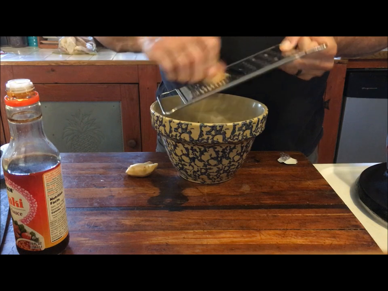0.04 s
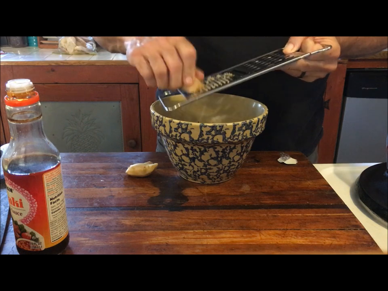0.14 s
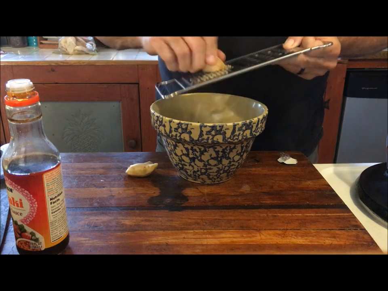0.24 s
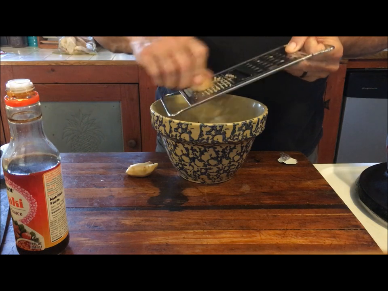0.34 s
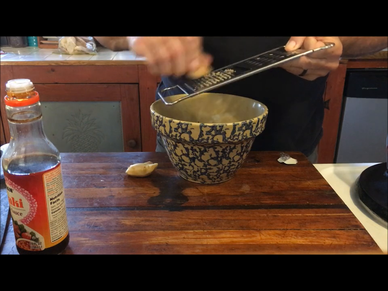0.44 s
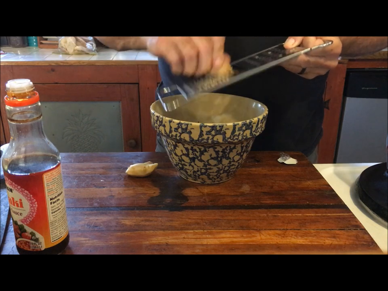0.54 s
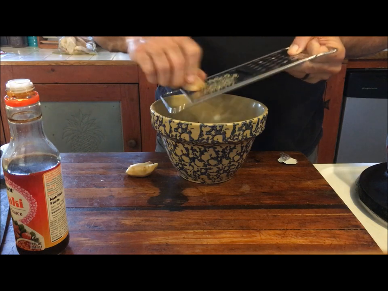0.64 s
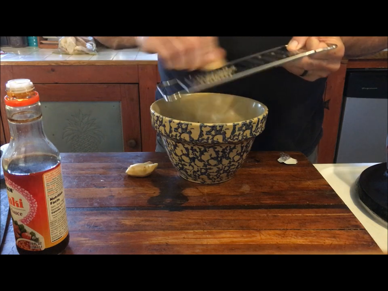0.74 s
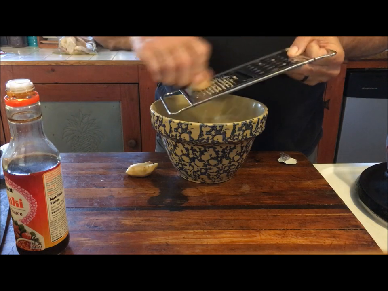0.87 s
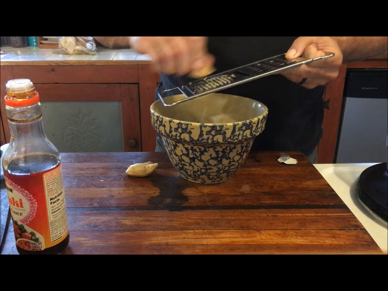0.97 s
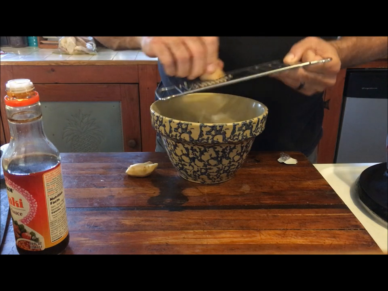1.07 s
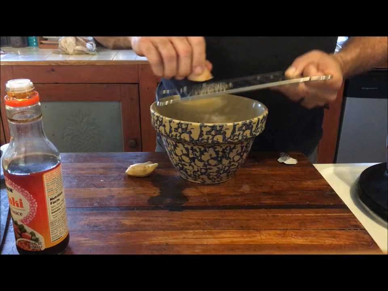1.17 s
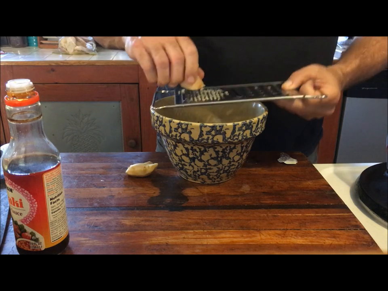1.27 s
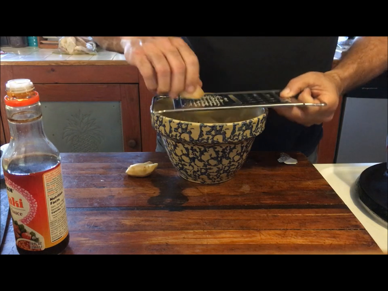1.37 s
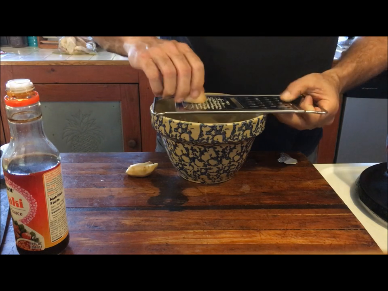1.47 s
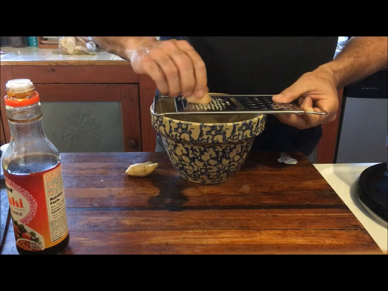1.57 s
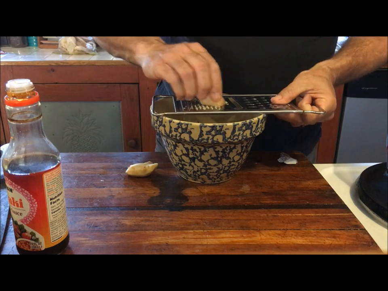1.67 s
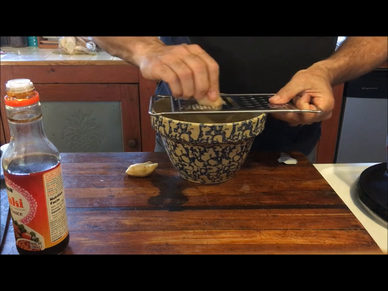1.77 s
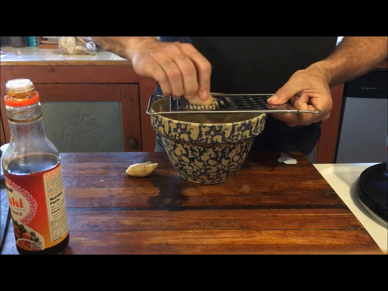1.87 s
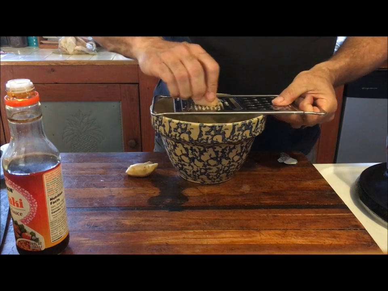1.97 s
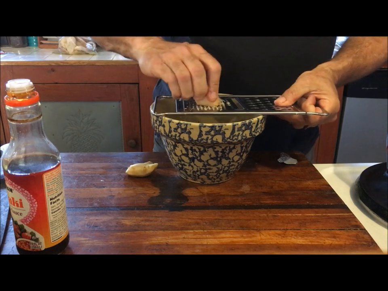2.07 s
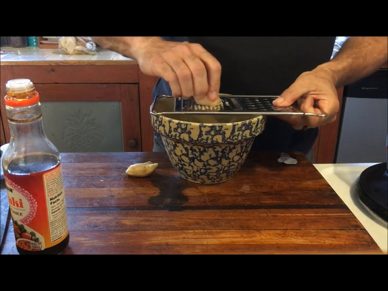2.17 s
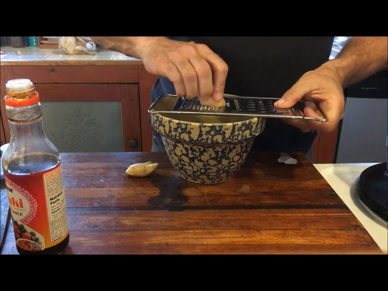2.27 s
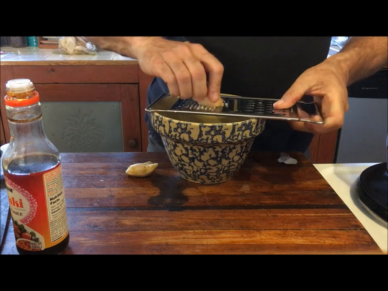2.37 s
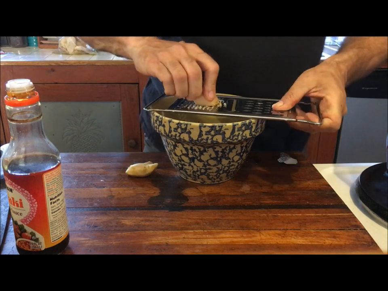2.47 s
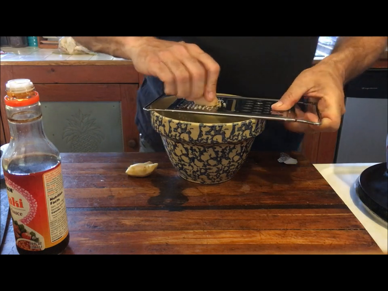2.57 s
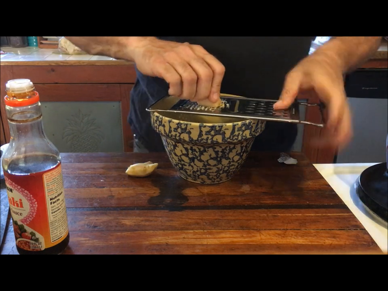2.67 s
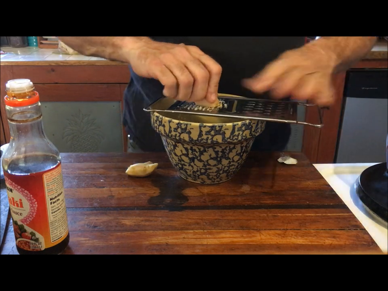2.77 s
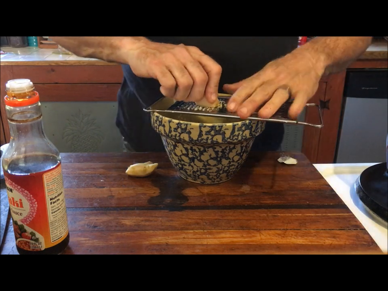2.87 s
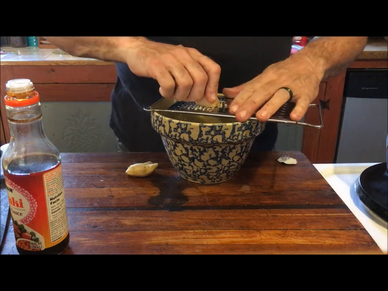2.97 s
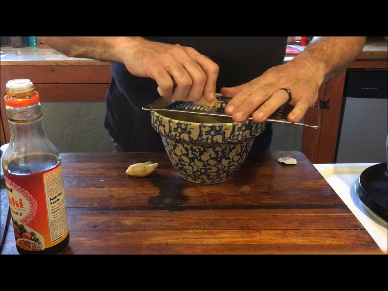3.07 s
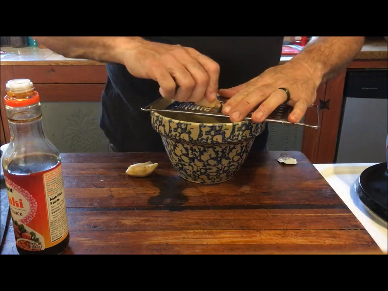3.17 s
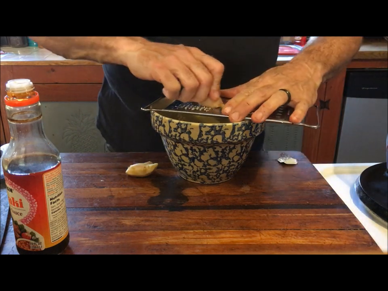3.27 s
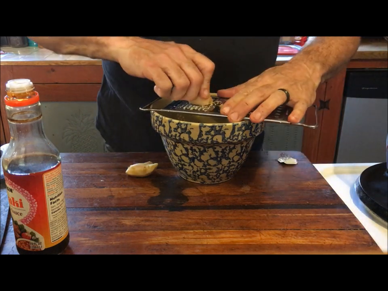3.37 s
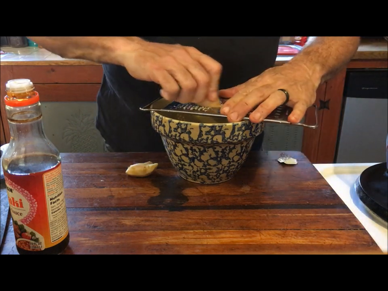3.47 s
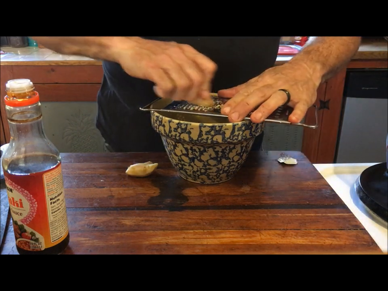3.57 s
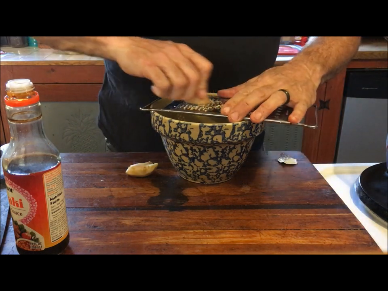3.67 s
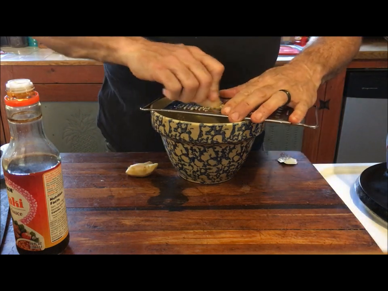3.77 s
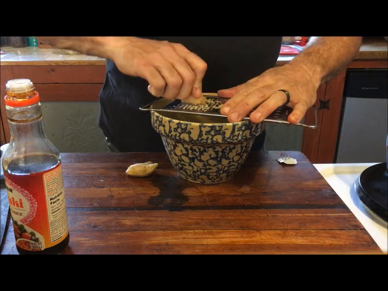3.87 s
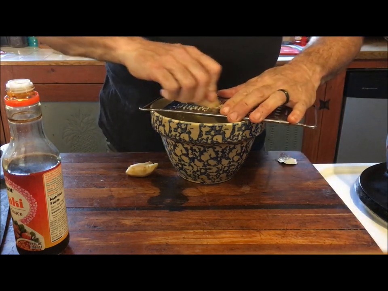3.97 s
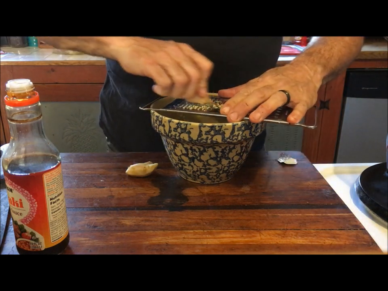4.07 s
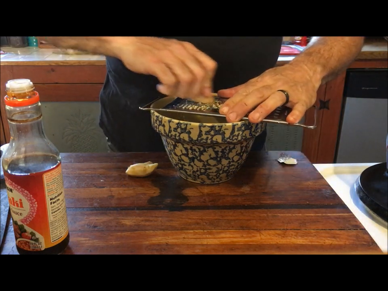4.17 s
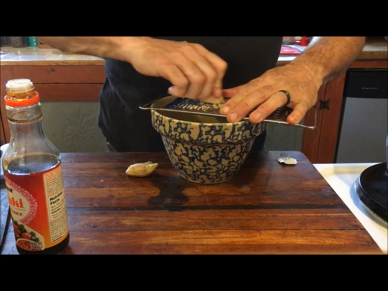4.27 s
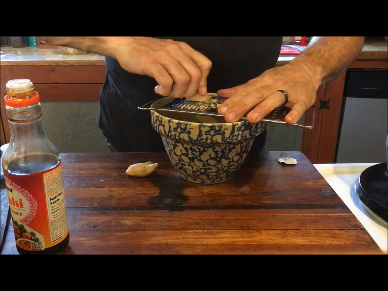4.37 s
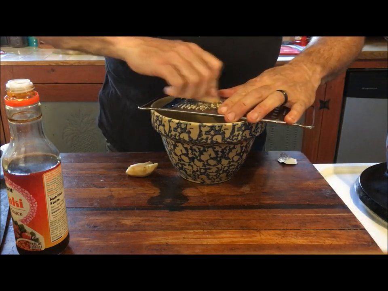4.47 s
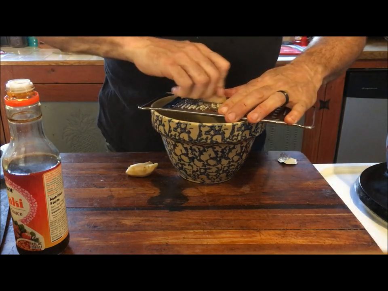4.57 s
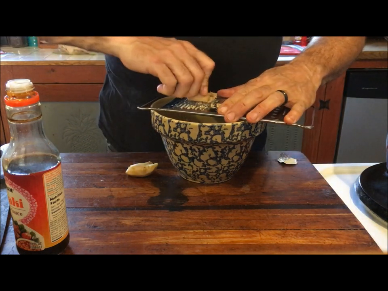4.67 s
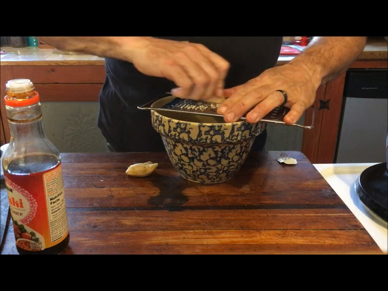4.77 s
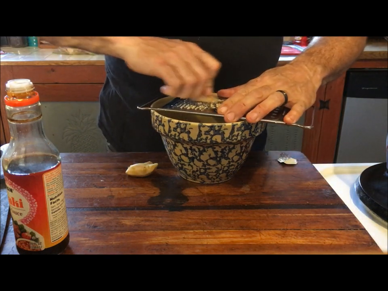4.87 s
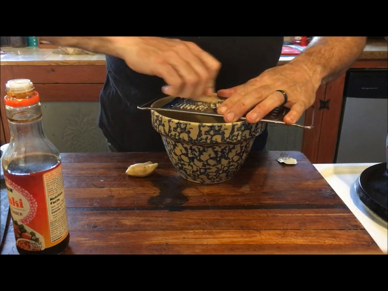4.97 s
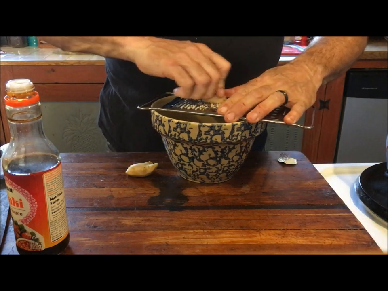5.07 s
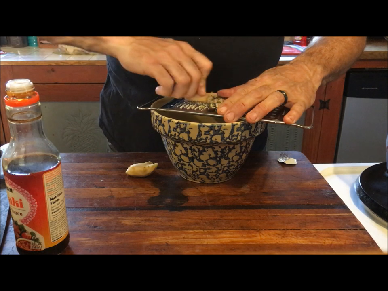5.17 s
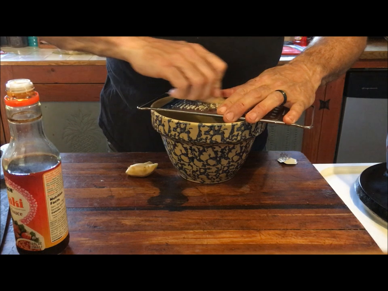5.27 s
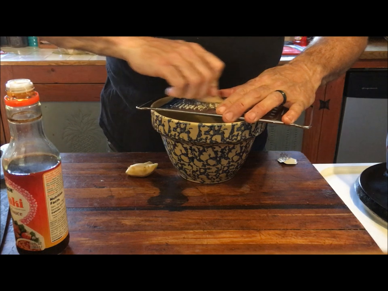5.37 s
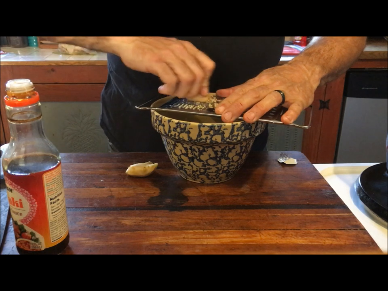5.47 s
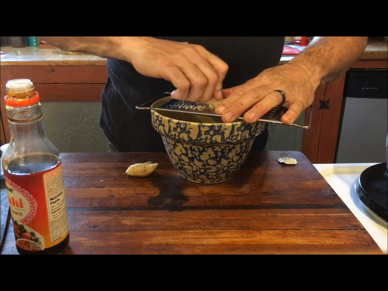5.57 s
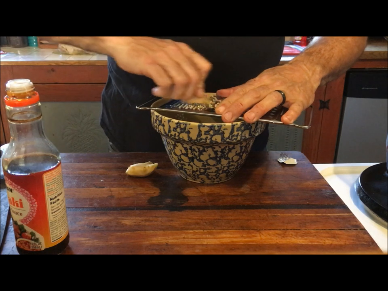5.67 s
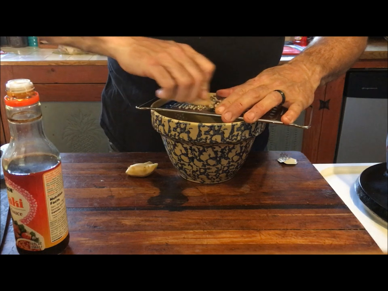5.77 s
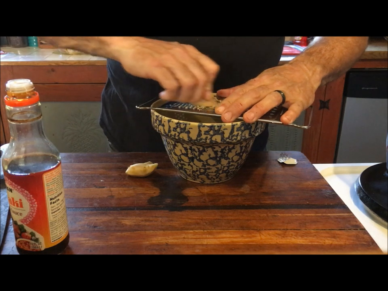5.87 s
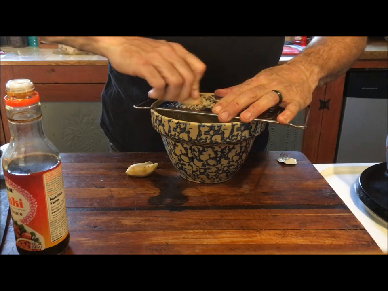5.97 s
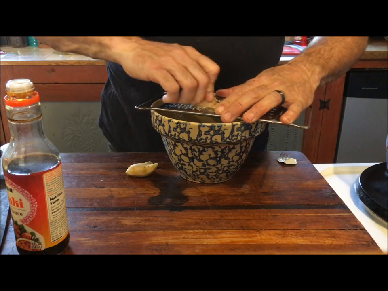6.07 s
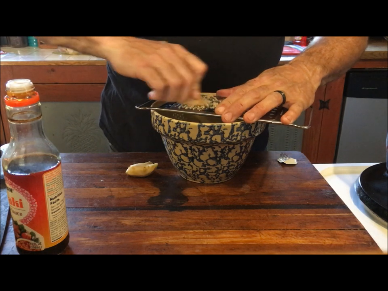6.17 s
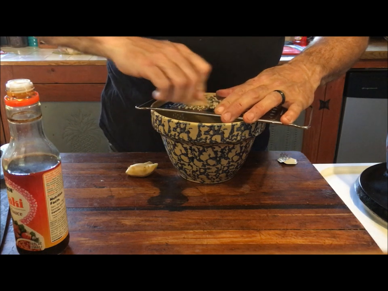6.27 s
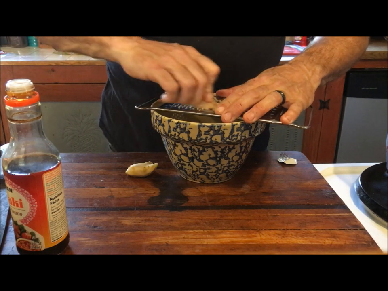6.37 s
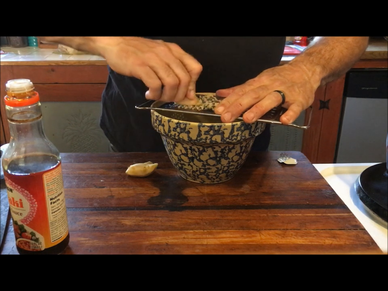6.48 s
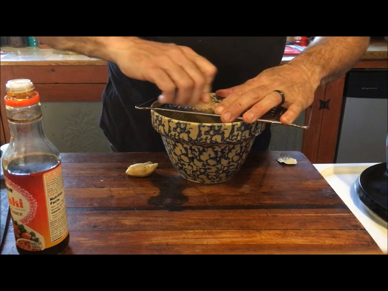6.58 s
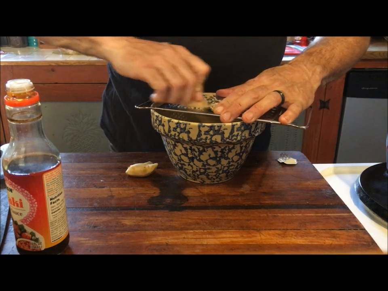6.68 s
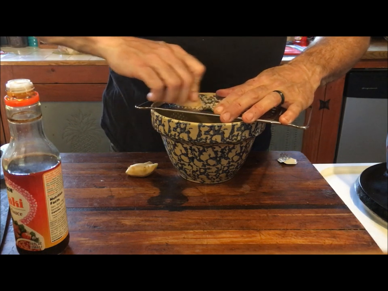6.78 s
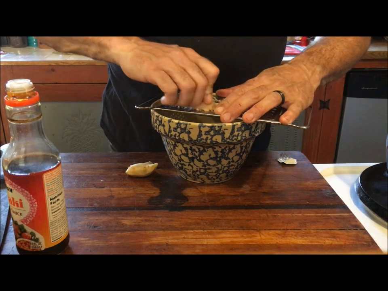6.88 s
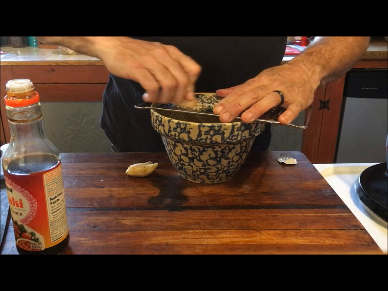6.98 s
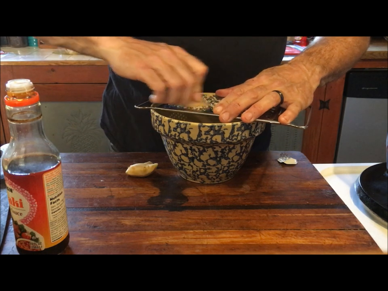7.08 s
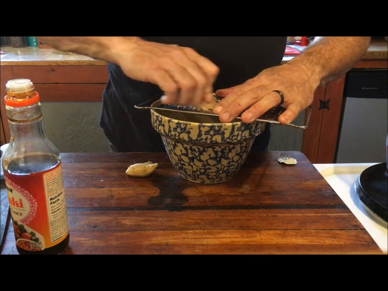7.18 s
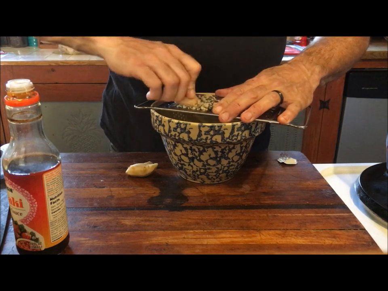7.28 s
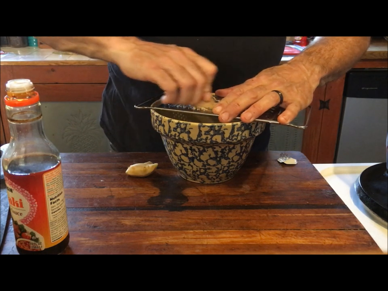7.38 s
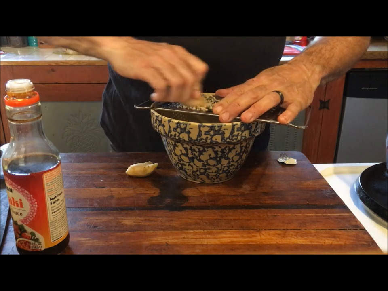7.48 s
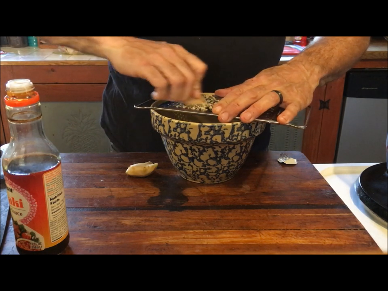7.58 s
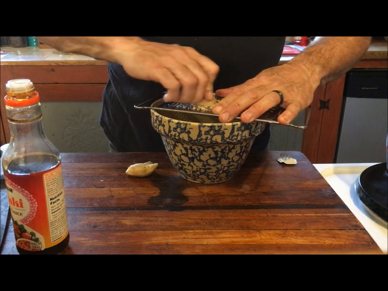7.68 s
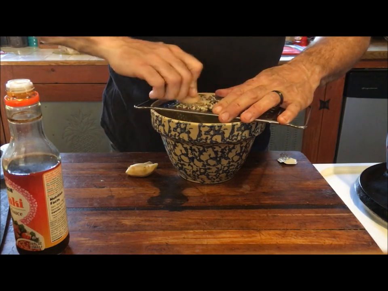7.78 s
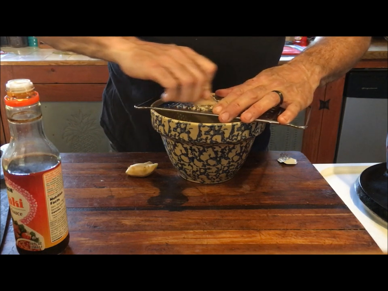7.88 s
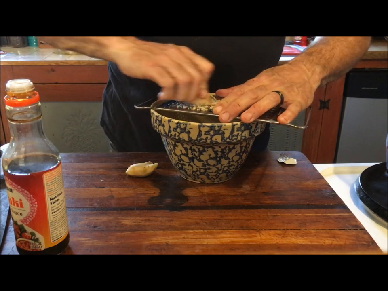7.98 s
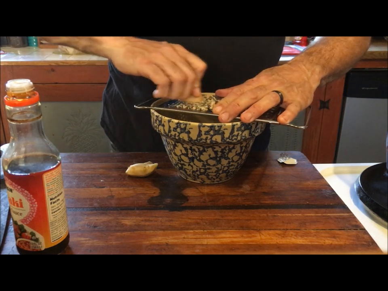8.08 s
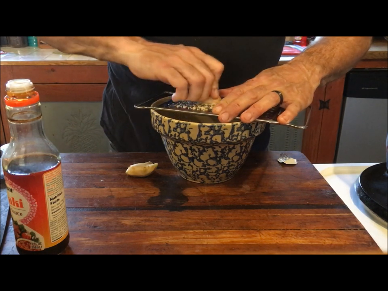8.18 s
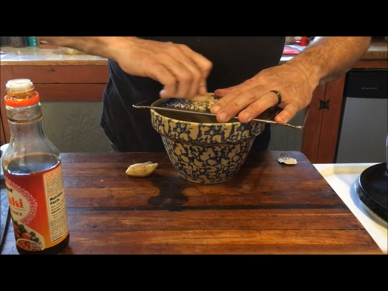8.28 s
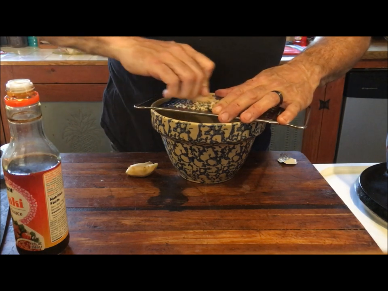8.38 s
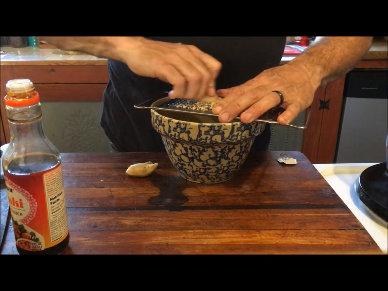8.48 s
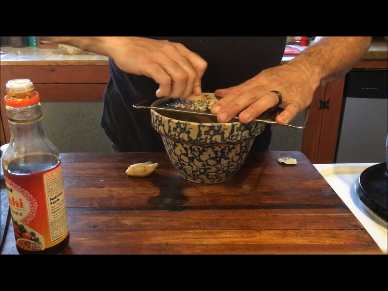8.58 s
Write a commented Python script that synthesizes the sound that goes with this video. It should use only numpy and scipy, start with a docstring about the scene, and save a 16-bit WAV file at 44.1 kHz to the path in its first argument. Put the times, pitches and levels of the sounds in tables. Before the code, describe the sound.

Raspy grating strokes and a few steel clinks, then quick back-and-forth grating with dull knocks of a bowl rocking on wood.

```python
"""In a softly humming kitchen, ginger is grated on a flat steel rasp.
The rasp is first held in the air, then laid clinking across a stoneware bowl.
Each stroke snaps a dense spray of fibres on the teeth; the blade rings when it touches or slides on
the rim. Under the quick back-and-forth strokes the bowl rocks and knocks on the wooden counter."""
import sys
import numpy as np
from scipy import signal
from scipy.fft import rfft, irfft, next_fast_len
from scipy.io import wavfile
from scipy.ndimage import uniform_filter1d

SR = 44100
rng = np.random.default_rng(int(sys.argv[2]) if len(sys.argv) > 2 else 0)


def dump(signal):
    """Clip the signal to [-1, 1] and save it as 16-bit WAV at the path in sys.argv[1]."""
    limited = np.clip(np.atleast_2d(signal).T, -1, 1)
    pcm = np.round(limited * 32767).astype(np.int16)
    wavfile.write(sys.argv[1], SR, pcm)


N = 380564
T = np.arange(N) / SR
RING_T = T[:SR // 2]  # half a second for a sound to die away

# A colour lists how strong each frequency is. A mode is one tone that a struck object rings with.
# t60 is the time a sound takes to fade by 60 dB, before any extra damping.
# colour of the kitchen's hum: f/Hz, level/dB
HUM_COLOUR = [(20, -29.5), (30, -20.5), (42, -35.5), (55, -4), (75, -6.5), (133, -19), (255, -24.5),
              (450, -34), (690, -41), (1280, -44), (5000, -52), (15800, -50)]
# echo from the walls: f/Hz, level/dB, t60/s
WALL_BANDS = [(61, 7.5, 0.58), (507, 2, 0.34), (2000, -2, 0.42), (5050, -4, 0.34), (10160, -5, 0.22),
              (16000, -6.5, 0.15)]
# rumble of the hand on the blade: t/s, level/dB
GRIP_LEVELS = [(1.36, -87), (1.42, -55.5), (1.65, -52.5), (2.0, -57), (2.6, -61.5), (3.501, -61.5),
               (3.8, -61)]
# colour of that rumble: f/Hz, level/dB
GRIP_COLOUR = [(30, -27), (75, -6), (160, -1), (300, -19), (700, -13.5), (2000, -24.5)]
# colour of the root's dull touch: f/Hz, level/dB
PAT_COLOUR = [(200, -32.5), (450, 6.5), (750, 1.5), (1200, -23.5), (2200, -17.5), (4000, -69)]
# colour of the counter's rumble under the strokes: f/Hz, level/dB
DRAG_COLOUR = [(30, -25), (70, 0), (170, 3), (300, -7.5), (420, -9), (550, -52), (1300, -15.5),
               (3000, -40)]

# the bowl rocks back onto the counter: t/s, strength/dB
KNOCKS = [(3.781, -36), (3.891, -23.5), (4.404, -26), (4.659, -19.5), (4.852, -37), (4.924, -19.5),
          (5.189, -19), (5.371, -29), (5.45, -14.5), (5.701, -28.5), (5.964, -23), (6.227, -17),
          (6.474, -19.5), (6.676, -29.5), (6.737, -15), (6.993, -13.5), (7.185, -31.5), (7.267, -30.5),
          (7.451, -24.5), (7.526, -27.5), (7.783, -31), (8.049, -21), (8.586, -14)]
# ring of the wooden counter: f/Hz, level/dB, t60/s
COUNTER_MODES = [(99, -10, .4), (145, -3, .42), (182, -11, .3), (203, -11, .25), (286, -10, .32),
                 (382, -10, .3), (467, -12, .2), (562, -9, .14), (625, -5, .18), (682, -6, .16),
                 (765, -8, .16), (803, -8, .18), (905, -17, .18), (1075, -14, .15), (1254, -8, .14),
                 (1295, -8, .15), (1365, -10, .13), (1605, -13, .12)]
# short swings of the bowl on its foot: f/Hz, level/dB, t60/s
CLOP_MODES = [(142, -3, .13), (190, -7, .11), (375, -7, .045), (635, 1.5, .055), (790, -4, .06),
              (1310, -5, .04), (1650, -8, .03)]
# noisy thud of the counter: f/Hz, level/dB, t60/s
THUD_BANDS = [(35, -30, 0.37), (67, -1.5, 0.45), (161, 1.5, 0.29), (208, -1.5, 0.24), (340, -8.5, 0.21),
              (463, -8.5, 0.35), (600, -12, 0.3), (960, -10, 0.2), (1190, -6.5, 0.11), (1720, -13, 0.052),
              (2390, -17, .12), (5000, -46, 0.12)]
# softer landings lose highs faster than lows: f/Hz, loss/(dB per dB of strength)
SOFTENING = [(150, 0.58), (350, 0.38), (620, 1.6), (1400, 1.68)]

# ring of the steel blade: f/Hz, level/dB, t60/s
BLADE_MODES = [(875, -17, .09), (3280, -19, .06), (4245, 0.5, .062), (4468, -17, .08), (5690, -11, .035),
               (5915, -10, .04), (6535, -13, .055), (6800, -15, .04), (7180, -12, .04), (7480, -5, .035),
               (8070, -13, .035), (8460, -12, .04), (11320, -2, .025), (12115, -2, .025), (12340, -1, .025),
               (12710, -9, .02), (13420, -7, .02)]
# ring of the stoneware bowl: f/Hz, level/dB, t60/s
BOWL_MODES = [(705, -8, .05), (1260, -10, .04), (1385, -6, .04), (1485, -4, .045), (1830, -10, .04),
              (2338, 0, .055), (2660, -7, .045), (3203, -13, .045), (3630, -13, .04)]
# the blade slides along the rim: t/s, length/s, level/dB
SLIDES = [(1.39, 0.088, -52), (1.48, 0.21, -42), (1.88, 0.25, -52.5), (2.23, 0.28, -50.5),
          (2.46, 0.14, -59.5), (2.665, 0.076, -45), (2.76, 0.091, -54.5), (2.955, 0.036, -57.5),
          (3.098, 0.059, -52.5), (3.183, 0.053, -51.5)]
# colour of steel scraping the rim: f/Hz, level/dB
RIM_COLOUR = [(100, -9.5), (300, 6.5), (600, 0), (1300, 3), (2400, -0.5), (3500, -4.5), (5000, -4),
              (5850, 0.5), (7000, -10), (12500, -10), (16000, -23.5)]
# taps on the blade, by the hand and later on the rim: t/s, level/dB, blade share/dB, bowl share/dB
CLINKS = [(0.1055, -12.5, -19, -57), (.649, -8.5, -8.5, -29.5), (1.2815, -15.5, -11, -18.5),
          (1.3768, -5.5, -9, -22.5), (1.423, -20.5, -25, -17), (1.492, -25, -6.5, -12),
          (1.5197, -8, -20.5, -25.5), (1.537, -17, -21, -30), (1.581, -36, 1, -31),
          (1.784, -33.5, -28, -15), (1.878, -30.5, -14, -36), (1.898, -23, -21, -24),
          (1.905, -20, -11.5, -8.5), (2.007, -33.5, -11, -24), (2.4538, -32, -11.5, -15),
          (3.4163, -30.5, -13.5, -4)]
# colour of the crack that starts a tap: f/Hz, level/dB
CRACK_COLOUR = [(150, 3.5), (700, -4), (2500, -2.5), (3400, -1.5), (4900, -4.5), (5800, 4), (8200, -3.5),
                (10200, 1), (12200, -9.5), (14000, -5), (16000, 3)]

# the root is set down for single strokes: t/s, length/s, level/dB
SINGLE_STROKES = [(0.0409, 0.18, -43), (0.3133, .15, -46.5), (0.575, 0.19, -45), (0.8339, 0.18, -46.5),
                  (1.85, 0.26, -59), (2.22, 0.26, -54.5), (2.44, 0.15, -56), (3.21, 0.1, -60.5)]
# steady grating, just under four cycles a second: t/s, count/cycles
PACE = [(3.366, 0), (4.366, 4), (5.699, 9), (6.72, 13), (7.259, 15), (8.297, 19), (8.84, 21)]
# how hard the root is pushed over the teeth: t/s, level/dB
PRESSURE = [(3.37, -50), (3.62, -44.5), (3.87, -48.5), (4.15, -43.5), (5.2, -41.5), (6.4, -41.5),
            (7.0, -43), (8.5, -42)]
# ring of the toothed face with the root pressed on it: f/Hz, level/dB, t60/s
TEETH_MODES = [(2630, -8, .022), (3130, -6, .014), (4280, -9, .03), (5930, -1, .009), (8150, -1, .008),
               (9450, 1, .005), (13000, 8, .002)]
# colour of tearing fibres: f/Hz, level/dB
FIBRE_COLOUR = [(150, -23), (500, -1.5), (1000, -8.5), (2000, -10.5), (3300, -9.5), (4900, -10.5),
                (5900, -5.5), (7000, -9.5), (8800, -2), (10300, -9), (12300, 0), (13500, -0.5), (16000, -3)]


def undb(db):
    """Turn decibels into a factor to multiply by."""
    return 10 ** (np.asarray(db) / 20)


def unit(x):
    """Scale x to an average strength (rms) of 1."""
    return x / np.sqrt(np.mean(x ** 2))


def shape(x, gain):
    """Filter x: multiply each frequency by gain(hz)."""
    size = next_fast_len(len(x) + 4096)
    hz = np.maximum(np.arange(size // 2 + 1) * SR / size, 1)
    return irfft(rfft(x, size) * gain(hz), size)[:len(x)]


def colour(x, points):
    """Filter x with a colour table, then scale it to strength 1."""
    f, db = np.transpose(points)
    return unit(shape(x, lambda hz: undb(np.interp(np.log(hz), np.log(f), db))))


def noise(points, size=len(RING_T)):
    """Noise of the given colour, at strength 1."""
    return colour(rng.standard_normal(size), points)


def fade(t60):
    """A curve that falls by 60 dB in t60 seconds."""
    return np.exp(-np.log(1000) * RING_T / t60)


def tail(bands):
    """Noise in which each frequency band dies away at its own pace."""
    f, db, t60 = np.transpose(bands)
    spectrum = rfft(noise(np.transpose([f, db])))
    log_hz = np.log(np.linspace(1, SR / 2, len(spectrum)))
    shares = [np.interp(log_hz, np.log(f), band) for band in np.eye(len(f))]
    return sum(irfft(spectrum * share, len(RING_T)) * fade(t) for share, t in zip(shares, t60))


def ring(modes, uneven_db=0, damping=1):
    """Fading tones of a struck object; the spot hit varies their levels, and pressure damps them."""
    share_db = uneven_db * rng.standard_normal(len(modes))
    return sum((-1) ** k * undb(db + share_db[k]) * fade(t60 / damping) * np.sin(2 * np.pi * hz * RING_T)
               for k, (hz, db, t60) in enumerate(modes))


def through(x, response):
    """Let x shake something that rings; the energy stays about the same."""
    return signal.fftconvolve(x, response / np.sqrt(np.sum(response ** 2)))[:N]


def add(out, start_s, x):
    """Mix x into out at the given time."""
    i = max(int(start_s * SR), 0)
    out[i:i + len(x)] += x[:max(N - i, 0)]


def wander(rate):
    """A smooth random curve that heads for a new value rate times a second."""
    step = max(int(SR / rate), 1)
    return 2.07 * uniform_filter1d(rng.standard_normal(N)[np.arange(N) // step], step)


def snaps(rate, spread_db):
    """Tiny random clicks, rate a second, a few much louder than the rest."""
    size = undb(spread_db * np.minimum(rng.exponential(size=N), 5))
    return unit((rng.random(N) < rate / SR) * size * rng.choice([-1, 1], N))


def rubbing(strokes, fastest, sharpness=1.56):
    """Strength of rubs over time: each speeds up until the share 'fastest' of its length, then slows."""
    out = np.zeros(N)
    skew = np.log(.5) / np.log(fastest)
    for start, length, db in strokes:
        span = (T > start) & (T < start + length)
        travel = ((T[span] - start) / length) ** skew
        out[span] += undb(db) * np.abs(np.sin(np.pi * travel)) ** sharpness
    return out


def kitchen_hum(level_db=-53, waver_db=0.68):
    """A low hum whose level wavers slightly."""
    return noise(HUM_COLOUR, N) * undb(level_db + waver_db * wander(rate=12))


def kitchen_echo(x, echo_db=-12, build_s=0.01):
    """Add the sound that bounces off the nearby walls; the treble dies sooner."""
    build_up = 1 - np.exp(-(RING_T / build_s) ** 2)
    return x + undb(echo_db) * through(x, tail(WALL_BANDS) * build_up)


def handling(waver_db=2):
    """Low rumble while the hand sets the blade down and shifts its grip."""
    level_db = np.interp(T, *np.transpose(GRIP_LEVELS))
    return noise(GRIP_COLOUR, N) * undb(level_db + waver_db * wander(rate=19))


def root_pats(above_stroke_db=4.5, wet_db=-17):
    """The moist root lands on the blade with a dull tap and a little wet tick."""
    out = np.zeros(N)
    for start, _, db in SINGLE_STROKES:
        dull = noise(PAT_COLOUR) * fade(t60=0.068)
        tick = undb(wet_db) * noise(FIBRE_COLOUR) * fade(t60=0.08)
        add(out, start, undb(db + above_stroke_db) * (dull + tick))
    return out


def drag_rumble(speed, rests_at_s=3.33, settle_s=0.4, rumble_db=-3, air_db=-12, air_hz=690, air_t60=.25):
    """Once the blade rests on the bowl, the tugging teeth shake the counter and the air in the bowl."""
    tug = speed * np.clip((T - rests_at_s) / settle_s, 0, 1)
    rumble = tug * noise(DRAG_COLOUR, N)
    air = through(tug * rng.standard_normal(N), ring([(air_hz, 0, air_t60)]))
    return undb(rumble_db) * rumble + undb(air_db) * air


def bowl_knocks(full_db=-13.5, lag_s=0.00486, bend_hz=600, highest_hz=1500, lowest_hz=125):
    """The bowl's foot lands on the counter: the wood rings and thuds, the bowl gives a short clop."""
    out = np.zeros(N)
    f, loss = np.transpose(SOFTENING)
    for start, db in KNOCKS:
        wood = undb(-14) * ring(COUNTER_MODES, uneven_db=2.5, damping=1.27)
        clop = undb(-7) * ring(CLOP_MODES, uneven_db=3)
        thud = undb(-10.5) * tail(THUD_BANDS)
        blow = wood - clop + thud
        # as the board bends, it carries the highs sooner than the lows
        blow = shape(blow, lambda hz: np.exp(-2j * np.pi * lag_s * bend_hz * np.arctan(hz / bend_hz)))
        # a landing softer than full_db is duller too
        gain_db = full_db + (db - full_db) * loss
        add(out, start, shape(blow, lambda hz: undb(np.interp(np.log(hz), np.log(f), gain_db))))
    # the contact is too long for the highest tones and too brief for the lowest
    out = signal.sosfilt(signal.butter(3, highest_hz, fs=SR, output="sos"), out)
    return signal.sosfilt(signal.butter(1, lowest_hz, "high", fs=SR, output="sos"), out)


def rim_slides(scrape_db=1, blade_db=-11, bowl_db=-8, slip_db=2):
    """Steel sticks and slips on the glazed rim; blade and bowl ring, damped by touching each other."""
    push = rubbing(SLIDES, fastest=0.32, sharpness=0.98)
    grit = snaps(rate=6000, spread_db=1.5) * undb(slip_db * wander(rate=130))
    scrape = undb(scrape_db) * push * colour(grit, RIM_COLOUR)
    blade = undb(blade_db) * through(push * grit, ring(BLADE_MODES[:8], damping=2))  # lower tones only
    bowl = undb(bowl_db) * through(push * grit, ring(BOWL_MODES, damping=1.6))
    return scrape + blade + bowl


def blade_clinks(crack_db=-9, chatter_db=-25, medium_tap_db=-17):
    """Hard taps: a crack and a brief chatter, while blade and bowl ring."""
    out = np.zeros(N)
    crack_fade = undb(crack_db) * fade(t60=0.055) + undb(chatter_db) * fade(t60=0.15)
    for start, db, blade_db, bowl_db in CLINKS:
        crack = noise(CRACK_COLOUR) * crack_fade
        steel = crack + undb(blade_db) * ring(BLADE_MODES, uneven_db=3.5, damping=0.92)
        db_per_octave = 0.2542 * (db - medium_tap_db)  # a harder tap is brighter
        steel = shape(steel, lambda hz: undb(db_per_octave * np.log2(np.clip(hz, 1500, 14000) / 7000)))
        bowl = undb(bowl_db) * ring(BOWL_MODES, uneven_db=3.5)
        add(out, start, undb(db) * (steel + bowl))
    return out


def root_motion(wait_s=0.018, push_share=0.52, overlap_s=0.0076, return_db=-6.5):
    """How strongly the root rubs: single strokes, then cycles of a firm push and a lighter return."""
    times, cycles = np.transpose(PACE)
    turns = np.interp(np.arange(cycles[-1] + 1), cycles, times)
    start, period = turns[:-1], np.diff(turns)
    push_s = push_share * period
    db = np.interp(start, *np.transpose(PRESSURE))
    # pushes are even, returns vary a lot
    push_scatter_db, return_scatter_db = (rng.standard_normal((len(start), 2)) * [0.1, 4.3]).T
    # strokes overlap because the root still scrapes as it turns
    pushes = zip(start, push_s + overlap_s, db + push_scatter_db)
    returns = zip(start + push_s, period - push_s + overlap_s, db + return_db + return_scatter_db)
    singles = [(touch + wait_s, length, level) for touch, length, level in SINGLE_STROKES]
    return rubbing(singles, fastest=0.37) + rubbing(pushes, fastest=0.42) + rubbing(returns, fastest=0.5)


def grating(speed, fibre_db=3.28, teeth_db=-8, blade_db=-27, catch_db=1.05):
    """Fibres catch unevenly and snap; others pluck the toothed face and, faintly, the whole blade."""
    catch = speed * undb(catch_db * wander(rate=110))
    tearing = catch * colour(snaps(rate=9200, spread_db=2), FIBRE_COLOUR)
    plucks = catch * snaps(rate=4000, spread_db=2)
    teeth = through(plucks, ring(TEETH_MODES))
    blade = through(plucks, ring(BLADE_MODES))
    return undb(fibre_db) * tearing + undb(teeth_db) * teeth + undb(blade_db) * blade


def scene():
    """Grating, clinks and knocks over the low hum of the kitchen, in one channel."""
    speed = root_motion()
    work = grating(speed) + drag_rumble(speed) + rim_slides() + handling()
    taps = blade_clinks() + bowl_knocks() + root_pats()
    return (kitchen_echo(work + taps) + kitchen_hum())[None]


def record(dry, top_hz=15900):
    """The microphone cuts off the highest treble steeply."""
    return signal.sosfilt(signal.ellip(10, .2, 80, top_hz, fs=SR, output="sos"), dry)


dry = scene()
out = record(dry)
dump(out)
```